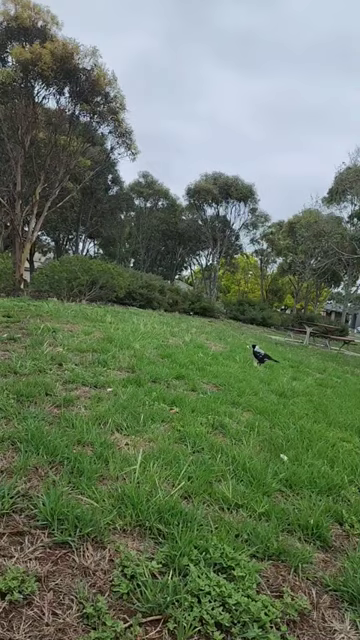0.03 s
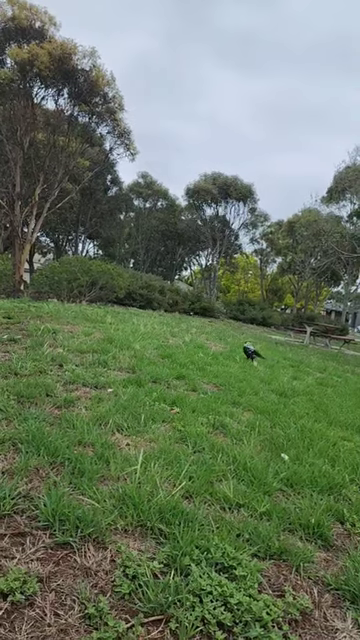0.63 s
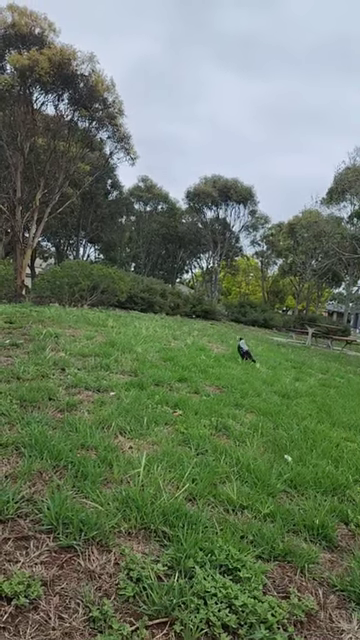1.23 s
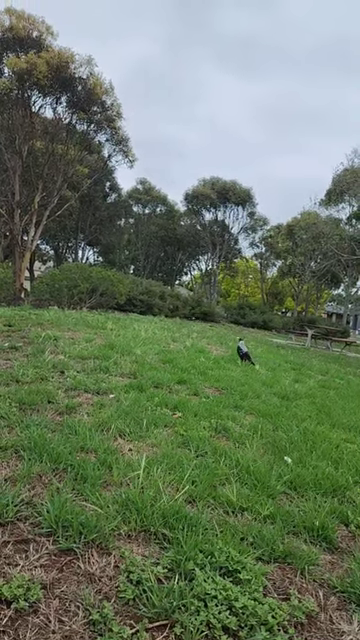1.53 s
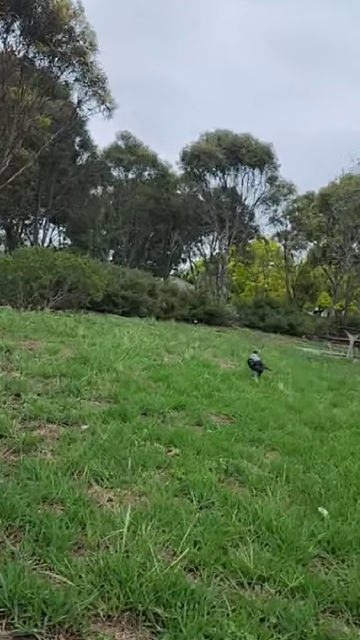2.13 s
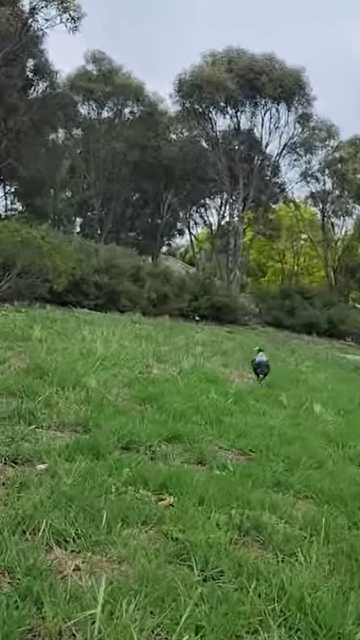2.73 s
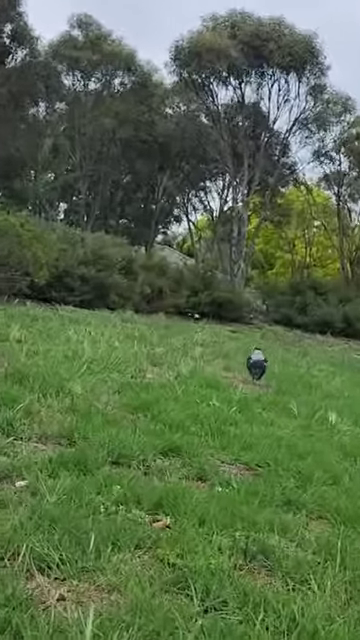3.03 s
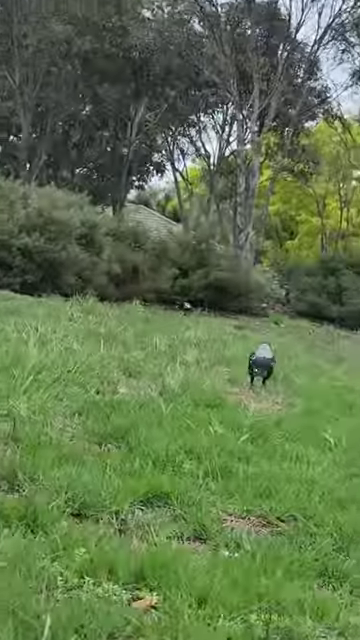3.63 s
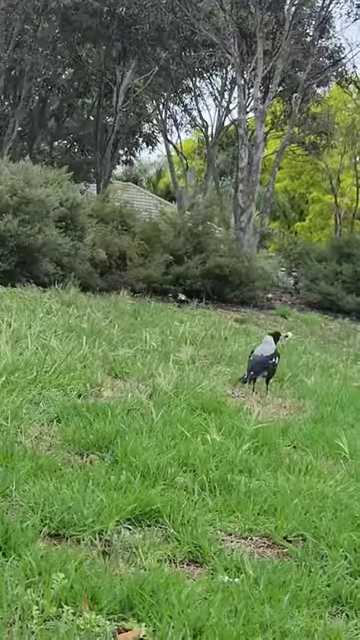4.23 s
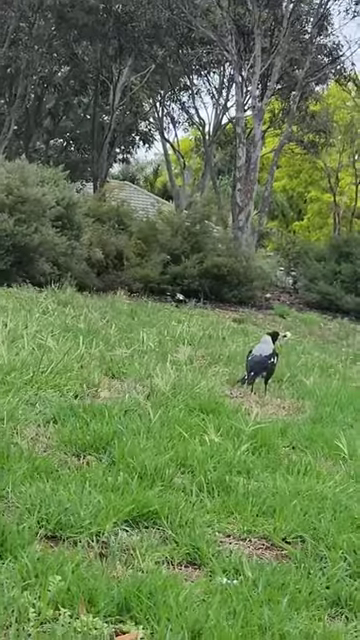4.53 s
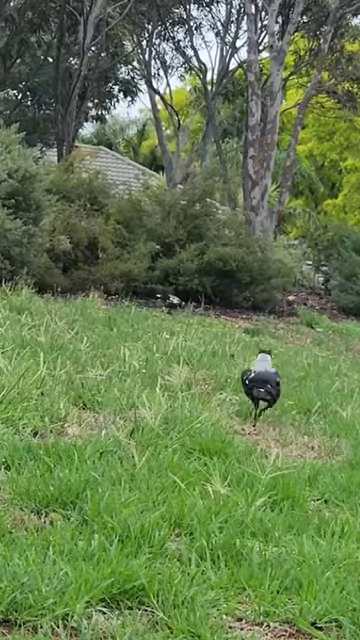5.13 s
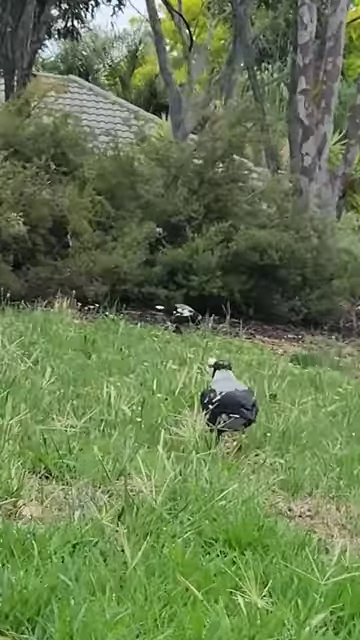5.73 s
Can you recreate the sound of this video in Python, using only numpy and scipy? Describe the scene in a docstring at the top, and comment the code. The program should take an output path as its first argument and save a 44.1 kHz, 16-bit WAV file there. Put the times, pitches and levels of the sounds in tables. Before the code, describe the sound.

Birds repeat short harsh buzzes and thin falling chirps over wind on the microphone, distant traffic and rustling grass.

```python
"""Birds on a grassy slope

Birds in the gum trees trade harsh, rising buzzes and thin, falling chirps, and the trees scatter them.
Wind thumps on the openings of a hand-held microphone as it moves over the lawn.
Far traffic hums, leaves hiss, grass rustles, and twigs and handling make a few dry ticks."""
import sys
import numpy as np
from scipy import signal
from scipy.fft import rfft, irfft, next_fast_len
from scipy.io import wavfile
from scipy.ndimage import uniform_filter1d, map_coordinates

SR = 44100
rng = np.random.default_rng(int(sys.argv[2]) if len(sys.argv) > 2 else 0)


def inscribe(sig):
    """Save sig as 16-bit PCM at rate SR to the path in sys.argv[1].

    A 1-D sig is mono; a 2-D sig holds one channel per row.
    Samples are clipped to [-1, 1] before scaling.
    """
    pcm = np.round(np.clip(np.atleast_2d(sig).T, -1, 1) * 32767)
    wavfile.write(sys.argv[1], SR, pcm.astype(np.int16))


N = 260190

# Pan is how much louder the left side is than the right; t60 is the time taken to fade by 60 dB.
# wind and traffic grow louder, and the traffic moves toward the centre (time [s], gain [dB], pan [dB])
BACKGROUND_SWELL = [(0.25, -10.5, 9.5), (1.7, -8, 6.5), (2.7, -4, 4), (3.7, -1.1, 3.5), (4.7, -1, 4.5),
                    (5.3, 0.5, 4), (5.9, 2, 2.5)]
# gusts on the microphone (start [s], length [s], peak level [dB], pan [dB])
GUSTS = [(0.489, 0.35, -42.5, -3.5), (0.848, 0.12, -42, -5), (1.197, 0.043, -46, 1),
         (2.747, 0.39, -49.5, 2), (3.909, 0.1, -33.5, -1), (4.206, 0.13, -37, 6), (4.377, 0.091, -42.5, 5),
         (5.11, 0.076, -37, -26), (5.198, 0.077, -31, -21), (5.306, 0.14, -36, -6), (5.465, 0.17, -43, 2),
         (5.68, 0.38, -58, 9)]
# breeze in the trees (time [s], level before the lift in leaves() [dB])
LEAF_BREEZE = [(0.25, -78), (0.77, -72.5), (1.0, -81.5), (1.22, -82.5), (1.47, -75.5), (1.69, -79.5),
               (2.2, -77.5)]
# swishes through grass, the short ones where a foot presses down (start [s], length [s], peak level [dB])
SWISHES = [(2.946, 0.2, -69.5), (3.098, 0.12, -59), (3.213, 0.068, -51), (3.244, 0.082, -55.5),
           (3.405, 0.12, -58), (3.485, 0.2, -50.5), (3.611, 0.02, -50), (3.627, 0.32, -50.5),
           (3.815, 0.071, -48), (3.858, 0.22, -49), (3.99, 0.025, -51.5), (4.044, 0.19, -49.5),
           (4.19, 0.23, -52.5), (4.44, 0.025, -58), (4.475, 0.021, -53.5), (4.77, 0.24, -51.5),
           (4.995, 0.23, -48), (5.2, 0.14, -60), (5.33, 0.12, -55.5), (5.408, 0.34, -50.5),
           (5.565, 0.043, -48.5), (5.653, 0.6, -49)]
# the tone colour of each noise, from low to high (frequency [Hz], relative level [dB])
WIND_COLOUR = [(15, -11.5), (30, -8.5), (52, 3), (75, 0), (115, -2.5), (160, -15.5), (230, -24), (400, -46),
               (1000, -77)]
DRONE_COLOUR = [(40, -2.5), (90, 4.5), (150, 6), (200, 0), (300, -6), (400, -17.5), (500, -28), (900, -69)]
TYRE_COLOUR = [(300, -3.5), (490, -7.5), (620, -3), (780, -3.5), (950, -2), (1150, -4), (1430, -3),
               (1650, -7), (1900, -10), (2600, -15), (4000, -18.5), (9000, -47)]
WHINE_COLOUR = [(500, -45), (690, -1.5), (740, 0), (800, 2), (880, -9.5), (1200, -59)]
LEAF_COLOUR = [(1200, -1), (2400, -4), (3500, 4), (5000, 1), (6700, -0.5), (8300, -4), (10000, -28),
               (16000, -38)]
GRASS_COLOUR = [(500, -13), (1200, -5.5), (1900, 0.5), (2500, 3.5), (3200, 5), (4000, 4.5), (4900, 4),
                (6500, 6.5), (8500, 3.7), (10500, -0.5), (12500, 2.5), (15500, 0)]
# harsh calls (start [s], length [s], level [dB], first pitch [Hz], held pitch [Hz],
# octave overtone [dB], roughness [0-1], flutter swing [Hz], loudest point [share of length])
BUZZES = [(0.201, 0.09, -58, 2300, 3480, -26, 0.3, 250, 0.74),
          (0.307, 0.1, -55.5, 2604, 3900, -6.5, 0.06, 282, .58),
          (1.354, 0.098, -51, 2600, 3710, -13, 0.4, 170, 0.81),
          (2.099, 0.096, -51.5, 2900, 3760, -6.5, 0.1, 300, 0.77),
          (3.269, 0.092, -44, 3100, 3856, -12, 0.09, 336, 0.69),
          (4.165, .084, -44.5, 3400, 3880, -13, 0.12, 232, 0.47),
          (4.935, 0.092, -39.5, 3180, 3840, -17, 0.12, 295, 0.59),
          (5.764, 0.075, -47.5, 3400, 3767, -17, 0.26, 220, 0.45)]
# how throat and beak shape the harsh calls (frequency [Hz], gain [dB])
THROAT = [(700, -48), (2100, 1.5), (3200, 2), (4000, 2.5), (4400, 3), (4900, 3.5), (5600, 0.5), (6500, -1),
          (7400, -5), (8400, -10), (10000, -28)]
# how long the tree line echoes (frequency [Hz], t60 [s])
TREE_ECHO = [(500, 0.57), (3500, 0.56), (10000, 0.061)]
# high raspy notes (start [s], length [s], level [dB], pitch [Hz], roughness [0-1])
RASPS = [(0.216, 0.06, -61.5, 5080, 0.54), (1.255, 0.15, -73.5, 6800, .95), (5.766, 0.1, -52.5, 5210, .7)]
# thin falling calls (start [s], length [s], level [dB], first pitch [Hz], last pitch [Hz])
CHIRPS = [(0.494, 0.038, -65.5, 4000, 2910), (0.596, 0.044, -65, 4600, 2930),
          (1.729, 0.053, -63, 4450, 2620), (2.312, 0.055, -59, 4250, 2850),
          (2.68, 0.048, -57.5, 4150, 2740), (3.196, 0.041, -58.5, 4300, 2840),
          (3.45, 0.042, -56, 4450, 2660), (3.948, 0.043, -59.5, 4200, 2920),
          (4.558, 0.053, -58, 4350, 2860), (5.196, 0.047, -57.5, 4200, 2816)]
# a far bird's soft twitter (start [s], length [s], level [dB], first pitch [Hz], last pitch [Hz])
TWITTER = [(0.66, 0.016, -69, 4350, 4520), (0.686, 0.021, -70, 3900, 3320), (0.724, 0.03, -67, 3320, 3730),
           (0.752, 0.02, -68, 3200, 2980), (0.758, 0.02, -68, 4400, 4520), (0.783, 0.016, -69, 3600, 3330),
           (0.818, 0.018, -72, 3380, 3600), (0.847, 0.013, -65.5, 3160, 2970),
           (0.866, 0.009, -72, 3120, 3060)]
# twig and handling ticks (time [s], peak level [dB], pitch [Hz], width [octaves], t60 [s], pan [dB])
TICKS = [(1.883, -54, 1600, 0.2, 0.021, 6), (1.883, -52.5, 5500, 0.4, 0.013, 5),
         (1.8955, -53, 11000, 0.87, 0.009, 12), (2.893, -40.5, 890, 0.75, 0.045, 17),
         (2.977, -44.5, 8070, 1.2, 0.011, 6), (3.196, -43, 11000, 1.0, .008, 2),
         (4.734, -41, 2790, 0.056, 0.028, 2), (5.658, -43, 4000, 0.18, 0.037, 15),
         (5.658, -33.5, 8900, 0.3, 0.006, 7), (5.662, -35, 1300, 0.74, 0.062, 25),
         (5.6655, -32.5, 1400, 0.98, 0.016, 14), (5.6795, -36, 1900, 0.84, 0.017, 13),
         (5.681, -38, 925, 0.2, 0.016, 18), (5.685, -47.5, 3100, 0.1, 0.15, 10),
         (5.7197, -35, 4000, 1.6, 0.0037, 14)]


def amp(db):
    """Turn decibels into a number to multiply by."""
    return 10 ** (np.asarray(db) / 20)


def unit(x):
    """Scale a signal to an average power of 1."""
    return x / np.sqrt(np.mean(x ** 2) + 1e-20)


def along(points, hz):
    """Read between the rows of a (frequency, value) table, with octaves evenly spaced."""
    freqs, values = np.transpose(points)
    return np.interp(np.log(hz + 1), np.log(freqs + 1), values)


def curves(rows):
    """Give each column after the time one value per sample."""
    times, *columns = np.transpose(rows)
    return [np.interp(np.arange(N) / SR, times, column) for column in columns]


def wobble(rate, size=N):
    """A smooth curve through random points, `rate` of them a second."""
    points = rng.standard_normal(int(size * rate / SR) + 4)
    return map_coordinates(points, [np.arange(size) * rate / SR])


def progress(length):
    """Run from 0 to 1 over a note."""
    return np.linspace(0, 1, round(length * SR))


def swell_at(start, length, rise, fall):
    """Swell from 0 to 1, hold and die away; rise and fall are shares of the length."""
    u = (np.arange(N) / SR - start) / length
    ramp = np.minimum(u / rise, (1 - u) / fall)
    return np.sin(np.pi / 2 * np.clip(ramp, 0, 1))


def filtered(x, response):
    """Multiply each frequency in x by response(hz)."""
    n = x.shape[-1]
    padded = next_fast_len(n + 8192)
    hz = np.fft.rfftfreq(padded, 1 / SR)
    return irfft(rfft(x, padded) * response(hz), padded)[..., :n]


def panned(pan_db):
    """Left and right gains that move a sound sideways and keep its power."""
    gains = amp(np.vstack([pan_db / 2, -pan_db / 2]))
    return gains / np.sqrt(np.mean(gains ** 2, axis=0))


def add(track, start, sound):
    """Mix a sound into a stereo track, `start` seconds in."""
    part = track[:, max(round(start * SR), 0):][:, :sound.shape[-1]]
    part += sound[..., :part.shape[-1]]


def rush(colour, alike, patchy_db):
    """Stereo noise with louder and softer patches; alike=1 makes both sides the same."""
    spectrum = signal.stft(rng.standard_normal((2, N)), nperseg=512)[2]
    patches = uniform_filter1d(rng.standard_normal(spectrum.shape[1:]), size=8, axis=0)
    patches = uniform_filter1d(patches, size=10, axis=1)
    noise = signal.istft(spectrum * amp(patchy_db * unit(patches)), nperseg=512)[1][:, :N]
    middle, side = filtered(noise, lambda hz: amp(along(colour, hz)))
    spread = np.arccos(alike) / 2
    middle, side = np.cos(spread) * middle, np.sin(spread) * side
    return unit(np.array([middle + side, middle - side]))


def wind():
    """Swirls of air thump on the microphone: a steady flow, plus gusts from either side."""
    gain_db, _ = curves(BACKGROUND_SWELL)
    flow_db = -43 + gain_db + 2 * wobble(9.8)
    power = (amp(flow_db) * panned(pan_db=1)) ** 2
    for start, length, db, pan_db in GUSTS:
        gust = amp(db) * panned(pan_db) * swell_at(start, length, rise=0.098, fall=0.35)
        power += gust ** 2
    swirls = rush(WIND_COLOUR, alike=0.65, patchy_db=1)
    swirl_power = uniform_filter1d(np.mean(swirls ** 2, axis=0), size=SR // 10)
    even_swirls = swirls / np.sqrt(np.abs(swirl_power) + 1e-9)
    return np.sqrt(power) * even_swirls


def traffic():
    """A far road gives a low drone and the hum of tyres, and far machinery adds a steady narrow whine."""
    gain_db, pan_db = curves(BACKGROUND_SWELL)
    drone = amp(-48 + gain_db) * rush(DRONE_COLOUR, alike=1, patchy_db=1.5)
    tyres = amp(-56.5 + gain_db) * panned(pan_db) * rush(TYRE_COLOUR, alike=0.27, patchy_db=1.5)
    whine = amp(-70) * panned(pan_db) * rush(WHINE_COLOUR, alike=0.15, patchy_db=0.5)
    return drone + tyres + whine


def leaves(lift_db=7):
    """Far-off leaves hiss as the breeze comes and goes."""
    breeze_db, = curves(LEAF_BREEZE)
    return amp(breeze_db + lift_db) * rush(LEAF_COLOUR, alike=0.022, patchy_db=2.5)


def grass(rest_db=-79, brush_db=-58, brush_from_s=2.71, brush_rise_s=0.99):
    """Grass hisses faintly at rest, then brushes and swishes in tiny crackles."""
    brushing = amp(brush_db) * np.clip((np.arange(N) / SR - brush_from_s) / brush_rise_s, 0, 1)
    swish_power = sum((amp(db) * swell_at(start, length, rise=0.27, fall=0.36)) ** 2
                      for start, length, db in SWISHES)
    level = np.sqrt(amp(rest_db) ** 2 + brushing ** 2 + swish_power)
    catching = wobble(160)  # blades catch and slip
    crackle = np.array([wobble(1200), wobble(1200)])
    rustle = amp(1.2 * catching + 2 * crackle) * rush(GRASS_COLOUR, alike=0.0098, patchy_db=2)
    return level * panned(pan_db=1.5) * unit(rustle)


def trill(pitch_hz, rough, rate_hz, swing_hz):
    """A slow flutter in a bird's voice box swings its whistle up and down; gives the phase of each."""
    n = len(pitch_hz)
    flutter = 2 * np.pi * np.cumsum(rate_hz * (1 + 0.03 * wobble(50, n))) / SR
    hz = pitch_hz + swing_hz * np.sin(flutter) + rough * 650 * wobble(1400, n)
    return 2 * np.pi * np.cumsum(hz) / SR, flutter


def among_trees(call, pan_db, lag_ms, near_db, near_t60, far_db):
    """A call arrives straight from its side, near branches smear it, and the far tree line echoes it."""
    arrival_s = np.array([[1], [-1]]) * lag_ms / 2000  # the left side hears it lag_ms after the right
    direct = panned(pan_db) * filtered(call, lambda hz: np.exp(-2j * np.pi * hz * arrival_s))
    hz, t, spectrum = signal.stft(rng.standard_normal((2, SR // 2)), SR, nperseg=256)
    far_fade = amp(-60 * t / along(TREE_ECHO, hz)[:, None])
    far = signal.istft(spectrum * far_fade, SR, nperseg=256)[1]
    t = np.arange(far.shape[1]) / SR
    near = rng.standard_normal(far.shape) * amp(-60 * t / near_t60)
    echo = amp(near_db) * near / np.linalg.norm(near[0]) + amp(far_db) * far / np.linalg.norm(far[0])
    heard = signal.fftconvolve(call[None], echo, axes=1)
    add(heard, 0, direct)
    return heard


def from_perch(call, pan_db):
    """A call from a perch close by carries little echo."""
    return among_trees(call, pan_db, lag_ms=0.13, near_db=-7, near_t60=0.04, far_db=-15)


def buzzes(flutter_hz=120, voices_apart_hz=630):
    """Both sides of a bird's voice box flutter together, a little apart in pitch, rising then holding."""
    out = np.zeros((2, N))
    for start, length, db, first_hz, held_hz, octave_db, rough, swing_hz, loudest in BUZZES:
        u = progress(length)
        n = len(u)
        pitch_hz = held_hz + (first_hz - held_hz) * (1 - u) ** 2.3
        phase, flutter = trill(pitch_hz, rough, flutter_hz, swing_hz)
        apart = np.pi * np.cumsum(voices_apart_hz + 80 * wobble(300, n)) / SR
        voices = np.sin(phase + apart) + 0.82 * np.sin(phase - apart)
        octave = np.sin(2 * phase + wobble(1500, n))
        octave += 0.54 * np.sin(2 * (phase - apart) + wobble(1500, n))
        hiss = 3 * rough * (1 - 0.41 * u) * rng.standard_normal(n)  # a forced call is noisiest at first
        throb = 1 - 0.2 * np.sin(flutter)
        source = throb * (voices + amp(octave_db) * octave + hiss)
        call = filtered(source, lambda hz: amp(along(THROAT, hz)))
        arch = np.interp(u, [0, loudest, 1], [0, 0.5, 1])
        swell = np.abs(np.sin(np.pi * arch)) ** 0.78
        add(out, start, from_perch(amp(db) * swell * unit(call), pan_db=9.5))
    return out


def rasps():
    """Higher bird notes, where one flutter both swings the pitch widely and pulses the loudness."""
    out = np.zeros((2, N))
    for start, length, db, hz, rough in RASPS:
        u = progress(length)
        phase, flutter = trill(np.full(len(u), hz), rough, rate_hz=110, swing_hz=517)
        note = (1 + 0.5 * np.cos(flutter)) * np.sin(phase)
        swell = np.abs(np.sin(np.pi * u)) ** 0.28
        add(out, start, from_perch(amp(db) * swell * unit(note), pan_db=11))
    return out


def whistles(notes, bend, hoarse_hz, near_db, far_db):
    """Thin gliding notes from deeper in the trees; a bend above 1 eases them into their last pitch."""
    out = np.zeros((2, N))
    for start, length, db, first_hz, last_hz in notes:
        u = progress(length)
        hz = last_hz + (first_hz - last_hz) * (1 - u) ** bend + hoarse_hz * wobble(1083, len(u))
        phase = 2 * np.pi * np.cumsum(hz) / SR
        swell = np.abs(np.sin(np.pi * u)) ** 0.5 * amp(3.3 * wobble(304, len(u)))
        note = amp(db) * swell * unit(np.sin(phase) + amp(-25) * np.sin(2 * phase))
        heard = among_trees(note, pan_db=4, lag_ms=0, near_db=near_db, near_t60=0.17, far_db=far_db)
        add(out, start, heard)
    return out


def ticks():
    """Each twig or handling tick is a burst of noise that rings around one pitch and dies at once."""
    out = np.zeros((2, N))
    t = np.arange(SR // 20) / SR
    for start, db, pitch_hz, width, t60, pan_db in TICKS:
        burst = rng.standard_normal(len(t)) + rng.standard_normal((2, len(t)))  # half shared by the sides
        ring = filtered(burst, lambda hz: np.exp(-0.5 * (np.log2((hz + 1) / pitch_hz) / width) ** 2))
        ring *= amp(-60 * t / t60)
        add(out, start, amp(db) * panned(pan_db) * ring / np.abs(ring).max())
    return out


def scene():
    """Birds and ticks over the open-air background."""
    background = wind() + traffic() + leaves() + grass()
    harsh_calls = buzzes() + rasps()
    chirps = whistles(CHIRPS, bend=1.7, hoarse_hz=150, near_db=-2.5, far_db=-8)
    twitter = whistles(TWITTER, bend=1, hoarse_hz=70, near_db=-6, far_db=-6)
    return background + harsh_calls + chirps + twitter + ticks()


def record(dry):
    """The microphone opens after a moment and keeps nothing above its highest frequency."""
    open_s, fade_in_s, top_hz = 0.23, 0.004, 15500
    opened = np.clip((np.arange(N) / SR - open_s) / fade_in_s, 0, 1)
    return filtered(dry * opened, lambda hz: hz < top_hz)


dry = scene()
out = record(dry)
inscribe(out)
```